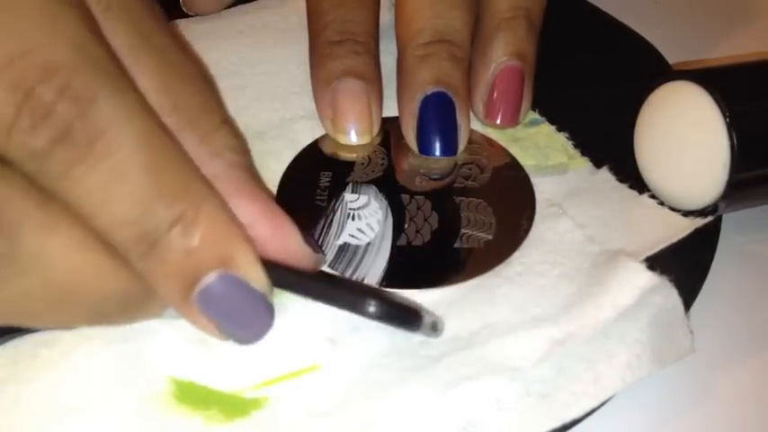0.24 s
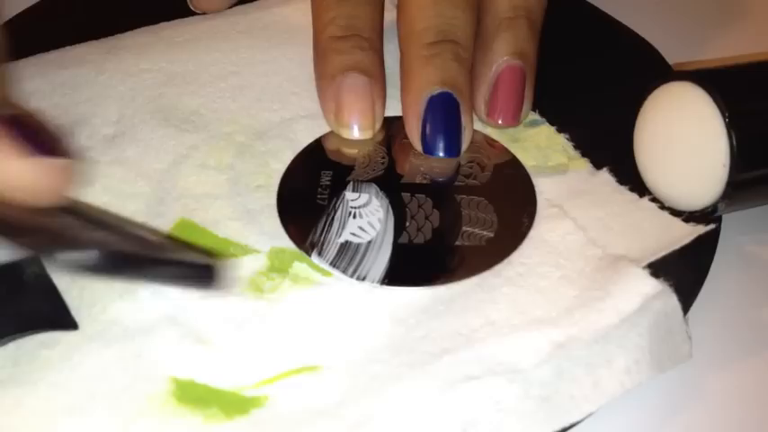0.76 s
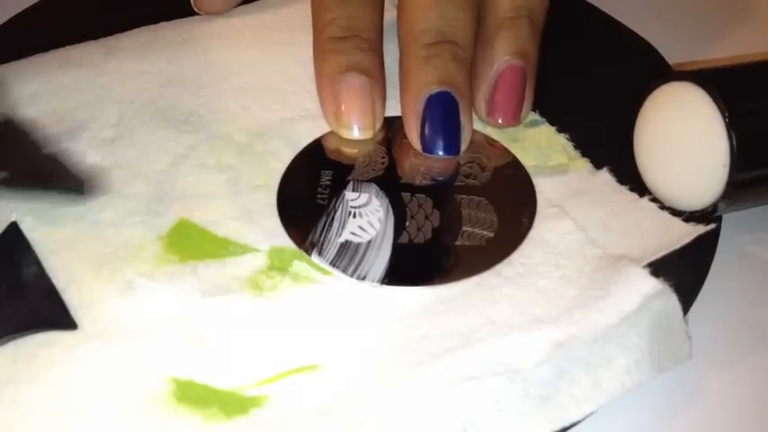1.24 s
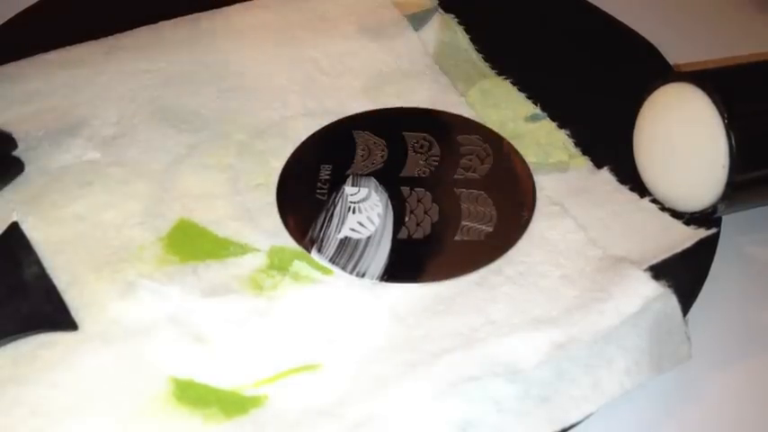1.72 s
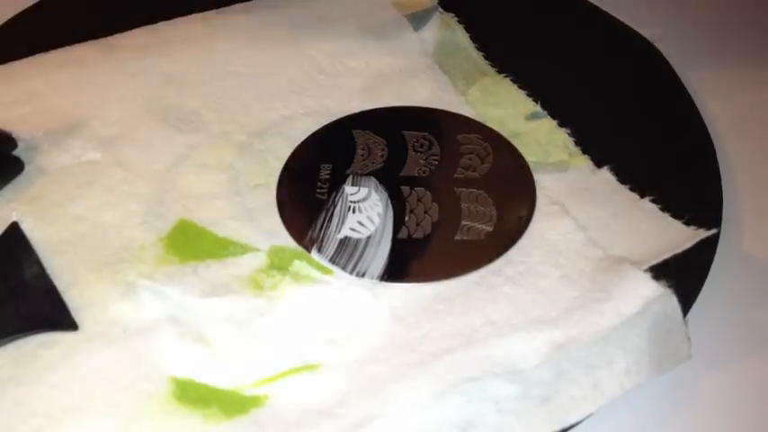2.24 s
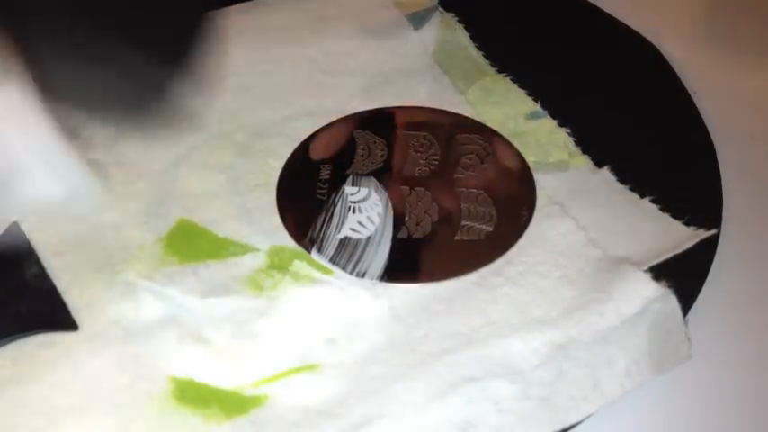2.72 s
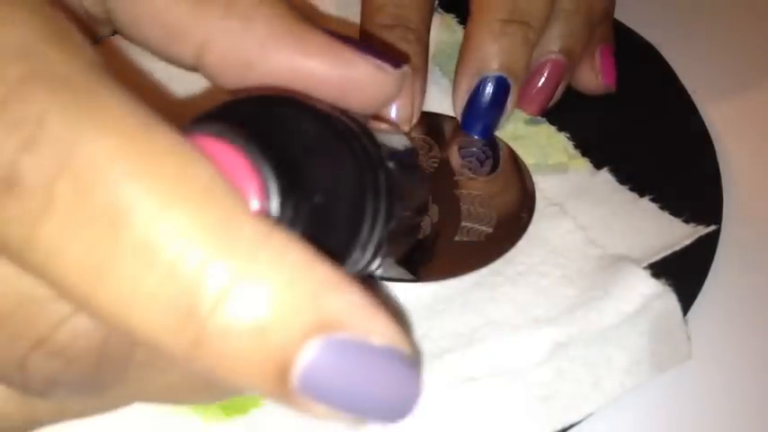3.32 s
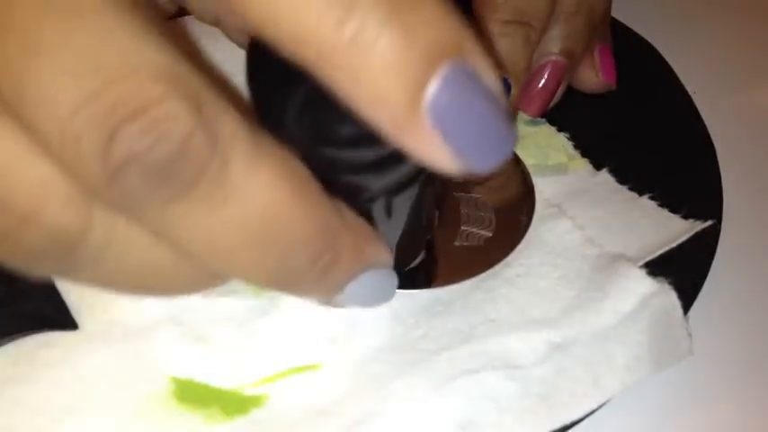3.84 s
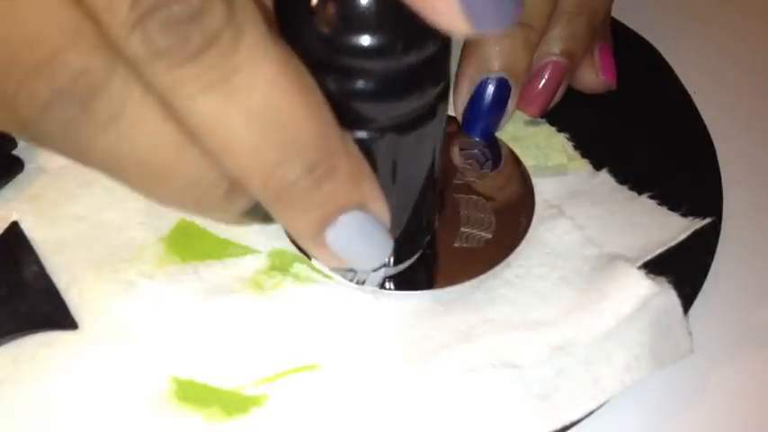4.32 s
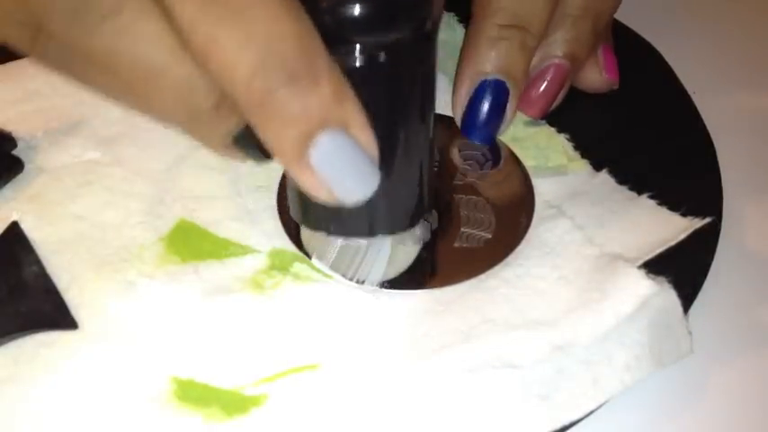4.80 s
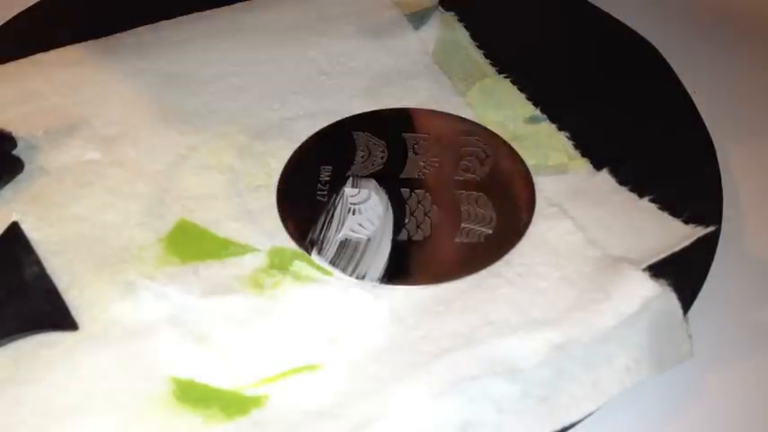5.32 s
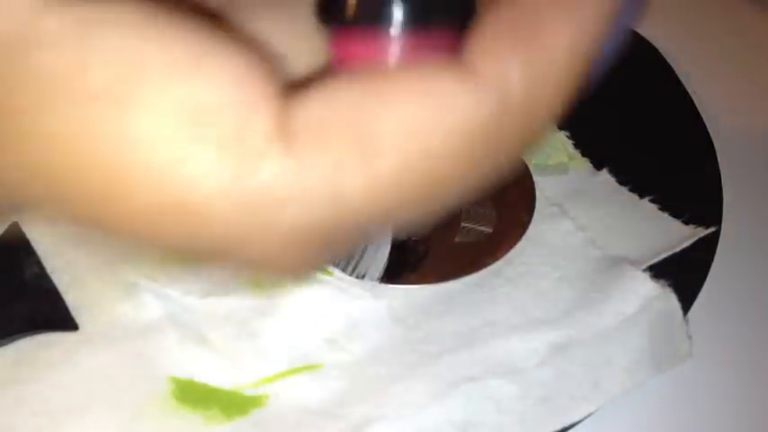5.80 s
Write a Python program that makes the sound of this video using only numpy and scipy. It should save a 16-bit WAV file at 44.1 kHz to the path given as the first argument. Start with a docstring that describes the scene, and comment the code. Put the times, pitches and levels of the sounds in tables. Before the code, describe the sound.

A short fading scrape on a steel plate breaks into a loud metallic snap, followed at once by coarse wiping on a paper towel. Light papery rustles, ticks and a firm thud lead to a fast hollow judder on the table. Then mostly quiet hiss with small plastic clicks, a low bump, and a brief tacky tearing sound. Dry, close microphone, small room, same in both channels.

```python
"""Scraping and stamping with nail polish

A plastic scraper is dragged over an etched steel stamping plate, snaps off its rim and is wiped on a paper towel.
Hands brush the towel and bump the table; a hollow stamper is picked up, rolled over the tacky plate and lifted off.
Rubbing is dense random slips through resonances or spectra; knocks are short pushes into decaying modes.
One close microphone with some hiss, in a small, quiet room; both channels carry the same sound."""
import sys
import numpy as np
from scipy import signal
from scipy.fft import rfft, irfft
from scipy.io import wavfile
from scipy.ndimage import uniform_filter1d, map_coordinates

SR = 44100
rng = np.random.default_rng(int(sys.argv[2]) if len(sys.argv) > 2 else 0)


def wrap_up_sound(samples):
    """Save the sound to the file named by the first command line argument, as 16-bit audio."""
    columns = np.atleast_2d(samples).T
    # keep every value between -1 and 1, then stretch to whole-number steps
    tamed = np.clip(columns, -1, 1)
    steps = np.round(tamed * 32767).astype(np.int16)
    wavfile.write(sys.argv[1], SR, steps)


N = 267334  # samples


# close to the microphone, the edge catches in the etching: t/s, level/dB
ETCHING_CATCHES = [(.008, -20), (.027, -34), (.0365, -29), (.063, -26), (0.067, -24.5), (.107, -26),
                   (.129, -26), (.186, -30.5)]
# resonances of blade and plate: f/Hz, width/Hz, level/dB
BLADE_RESONANCES = [(267, 153, -0.5), (1280, 220, -1.5), (2120, 410, 0), (2640, 340, 3.5), (4020, 590, 0.5),
                    (5730, 1100, -1.5), (7400, 820, -4.5), (8400, 300, -3), (9070, 1200, -9)]
# the pressure eases steadily until the edge reaches the rim
SCRAPE_DB, SCRAPE_SAG_DB_PER_S, SCRAPE_END_S, SCRAPE_FALL_S = -30, 39, 0.2, .035
CATCH_S = 0.0048  # a catch loses 17 dB in this time


def scraper():
    """The edge slips over the etched steel and catches in its grooves; both ring blade and plate."""
    t = np.arange(N) / SR
    pressure = undb(SCRAPE_DB - SCRAPE_SAG_DB_PER_S * t)
    force = pressure * stroke(0, SCRAPE_FALL_S, SCRAPE_END_S, SCRAPE_FALL_S)
    for s, db in ETCHING_CATCHES:
        add(force, s, undb(db) * np.exp(-2 * t[:SR // 10] / CATCH_S))
    slips = unit(grit(rate=6000, spread_db=2.5, chatter_hz=302, chatter_db=1.0))
    steady_level = np.std(body(slips, BLADE_RESONANCES))
    return body(slips * force, BLADE_RESONANCES) / steady_level


# the blade snaps off the rim and slaps the plate: t/s, peak level/dB, contact/s
RIM_SNAPS = [(.2139, -4.5, 0.00028), (.2152, -11, 0.00096), (.244, -19.5, 0.00053)]
# modes of the plate lying on the towel: f/Hz, level/dB, t60/s
PLATE_MODES = [(257, -5.5, 0.079), (335, -17, .08), (395, -2, 0.095), (445, -1.5, 0.1), (497, 0, 0.026),
               (762, -4.5, 0.059), (1210, -7, 0.025), (1414, -10.5, 0.033), (1990, 4.5, 0.013),
               (2620, -1.5, 0.02), (3540, -4, 0.029), (3780, -8, 0.05), (6260, 12.5, 0.0098)]


def snap():
    """The released blade strikes the plate and excites its modes."""
    return knocks(RIM_SNAPS, PLATE_MODES, rattle_db=-1, rattle_t60=0.21, rattle_hz=515)


# the blade wiped hard on the towel: t/s at full speed, rise/s, hold/s, fall/s, level/dB
HARD_WIPES = [(0.245, 0.019, 0.018, 0.078, -32), (0.454, .003, .002, 0.023, -32),
              (0.483, 0.048, 0.063, 0.0099, -23)]
# light brushes over the towel:
# t/s at full speed, rise/s, hold/s, fall/s, fibre hiss level/dB, dull rub level/dB
LIGHT_BRUSHES = [(0.647, .12, .015, .07, -45, -52.5), (0.944, 0.065, .12, 0.22, -36, -42.5),
                 (1.295, 0.089, .045, 0.062, -31, -36), (1.471, 0.093, .03, .1, -41.5, -54),
                 (1.546, .04, 0.053, .12, -34, -41.5), (1.659, .04, .008, 0.15, -37.5, -46),
                 (2.071, 0.024, 0.0073, 0.018, -33.5, -40), (2.77, 0.082, .04, 0.1, -46.5, -46.5),
                 (5.08, 0.077, .035, 0.12, -40, -45), (5.213, .04, .008, 0.067, -46, -47.5),
                 (5.317, .05, .015, 0.27, -47.5, -51.5), (5.555, 0.12, 0.21, 0.18, -51, -56),
                 (5.897, .16, 0.077, .025, -44, -52.5)]
# spectra of the hard wipe, the fibre hiss and the dull rub: f/Hz, level/dB per Hz
WIPE_SPECTRUM = [(70, -49), (140, 13), (220, 13), (450, 7.5), (700, -3.5), (1250, 1), (1800, -2), (2700, 1),
                 (4000, 1.5), (7200, -0.5), (9600, -3), (10800, -16), (15000, -12.5)]
FIBRE_SPECTRUM = [(1500, -26), (3000, -6), (3900, -1), (6000, -4), (7000, 0.5), (8200, -1.5), (9600, -8),
                  (11000, -11.5), (15000, -19)]
RUB_SPECTRUM = [(80, -41), (170, 5.5), (450, 3.5), (700, -9), (1050, 2), (1700, -4), (2600, -0.5),
                (3600, -8), (6000, -35)]


def towel():
    """Paper fibres flick under the blade; hard wipes also shake the table, light brushes mostly hiss."""
    wipe = unit(colour(grit(rate=12000, spread_db=1.7, chatter_hz=309, chatter_db=1.6), WIPE_SPECTRUM))
    fibres = unit(colour(grit(rate=10000, spread_db=1.8, chatter_hz=148.0, chatter_db=0.5), FIBRE_SPECTRUM))
    rub = unit(colour(grit(rate=6500, spread_db=2.5, chatter_hz=79.46, chatter_db=4.0), RUB_SPECTRUM))
    out = np.zeros(N)
    for s, rise, hold, fall, db in HARD_WIPES:
        out += stroke(s, rise, hold, fall) * undb(db) * wipe
    for s, rise, hold, fall, hiss_db, rub_db in LIGHT_BRUSHES:
        out += stroke(s, rise, hold, fall) * (undb(hiss_db) * fibres + undb(rub_db) * rub)
    return out


# blows that reach the table: t/s, peak level/dB, contact/s
TABLE_BLOWS = [(.114, -24.5, 0.0013), (.216, -14, 0.0033), (.956, -30.5, 0.00095), (1.523, -29.5, 0.008),
               (1.622, -30, 0.0027), (1.6725, -7.5, 0.0049), (2.035, -25.5, 0.0015), (2.081, -21.5, 0.0027),
               (2.535, -30.5, 0.0016), (2.761, -29.5, 0.00057), (2.801, -31.5, .0006),
               (4.6882, -19.5, 0.00025), (4.6905, -15, 0.0065), (4.787, -33, .005), (4.847, -21, 0.0068),
               (4.854, -27, 0.0021), (5.0992, -23.5, 0.00091)]
# modes of the table under the plate: f/Hz, level/dB, t60/s
TABLE_MODES = [(160.7, -9.5, 0.19), (195, -8.5, 0.095), (221, -6.5, 0.053), (245, -5, 0.1), (325, 0, 0.056),
               (375, -0.5, 0.04), (459, -3, 0.11), (504, 1.5, 0.048), (620, -13, 0.037),
               (1120, -1.5, 0.049), (2500, 9.5, 0.012)]


def table_bumps():
    """Blows push into the modes of the table."""
    return knocks(TABLE_BLOWS, TABLE_MODES, rattle_db=7.5, rattle_t60=0.068, rattle_hz=416)


# the stamper judders on the table as it is picked up: t/s, peak level/dB, contact/s
STAMPER_JUDDER = [(2.035, -31, 0.0021), (2.0445, -43, .0012), (2.0495, -20, 0.0017), (2.0605, -14, 0.0016),
                  (2.0692, -11, 0.00092), (2.0715, -15, 0.00029), (2.0765, -18, 0.00024),
                  (2.0832, -8, 0.001)]
# modes of the hollow stamper: f/Hz, level/dB, t60/s
STAMPER_MODES = [(445.5, -11, 0.15), (531, -6, 0.11), (509, -0.5, 0.089), (672, -5.5, 0.057),
                 (867, 2.5, 0.068), (940, -14, .05), (961, 6, 0.083), (1140, -22, 0.054), (1256, -9, 0.091),
                 (1646, -3, 0.036), (2290, -5.5, 0.033), (2650, -25, .03)]


def stamper_judder():
    """Quick repeated contacts with the table ring the hollow stamper."""
    return knocks(STAMPER_JUDDER, STAMPER_MODES, rattle_db=-3, rattle_t60=0.12, rattle_hz=1200)


# the blade or the rubber pad grips and shudders at one resonance:
# t/s at the middle, level/dB, length/s, f/Hz, width/Hz of each of two filter passes
GRIP_SHUDDERS = [(.481, -30.5, 0.0072, 3950, 600), (.4945, -24.5, 0.0067, 1244, 400),
                 (.536, -27.5, 0.014, 4000, 600), (.545, -28.5, 0.012, 9040, 1300),
                 (.959, -36, 0.02, 1130, 700), (1.322, -40, 0.032, 440, 260), (4.98, -45, 0.04, 178, 50),
                 (5.032, -37, 0.033, 185, 40), (5.109, -35, 0.017, 205, 90)]


def grips():
    """Brief bursts of stick and slip, each swelling and dying in one narrow band."""
    out, t = np.zeros(N), np.arange(-SR // 8, SR // 8) / SR
    for s, db, length, hz, width_hz in GRIP_SHUDDERS:
        once = resonate(rng.standard_normal(len(t)), hz, width_hz)
        shudder = unit(resonate(once, hz, width_hz))
        add(out, s + t[0], undb(db) * shudder * np.exp(-2 * (t / length) ** 2))
    return out


# resonances of the peeling pad: f/Hz, width/Hz, level/dB
PAD_RESONANCES = [(203, 47, 17.5), (530, 100, 5), (1044, 95, 13.5), (1240, 110, 7), (2220, 88, 10.5),
                  (2690, 130, 6.5)]
# the pad peels off the tacky polish, harder and harder until it lets go
PEEL_S, PEEL_LENGTH_S, PEEL_DB, PEEL_GROWTH_DB_PER_S, PEEL_EDGE_S = 5.0985, 0.0189, -34.5, 270, 0.0024


def peel():
    """Threads of polish tear in quick succession and ring the stamper's pad."""
    tears = grit(rate=2400, spread_db=3.0, chatter_hz=300, chatter_db=0.5)
    pulled_s = np.clip(np.arange(N) / SR - PEEL_S, 0, PEEL_LENGTH_S)
    pull = undb(PEEL_DB + PEEL_GROWTH_DB_PER_S * pulled_s)
    pull = pull * stroke(PEEL_S, PEEL_EDGE_S, PEEL_LENGTH_S, PEEL_EDGE_S)
    return unit(body(tears, PAD_RESONANCES)) * pull


# sharp ticks of plastic, nails and tacky polish: t/s, peak level/dB, t60/s, tilt/dB per octave
CONTACT_TICKS = [(0.2136, -1, 0.0097, 0.5), (0.2164, -13, 0.014, -8.5), (0.3232, -28, 0.0094, 1),
                 (0.709, -17, 0.013, 7.5), (1.589, -12.5, 0.0076, -2), (1.596, -17, .012, 6),
                 (1.625, -16.5, 0.0054, 2), (1.7058, -21, .008, 3), (1.7448, -20, 0.01, 3),
                 (1.756, -22, 0.015, 3.5), (2.503, -20, 0.013, -1.5), (2.537, -30.5, 0.024, 4),
                 (2.86, -28, 0.021, 1.5), (2.963, -28.5, 0.012, -3.5), (4.6883, -22, 0.011, -7),
                 (4.9553, -22, 0.011, -2), (5.064, -23, 0.016, -2.5), (5.0782, -19.5, 0.017, -0.5),
                 (5.0988, -17.5, .008, -1), (5.2163, -25.5, 0.015, 0), (5.247, -23.5, 0.024, -0.5)]


def ticks():
    """Sharp contacts crack briefly, each with its own brightness."""
    out = np.zeros(N)
    for s, db, t60, tilt_db in CONTACT_TICKS:
        add(out, s, undb(db) * crack(t60, tilt_db))
    return out


# the stamper's casing creaks in the fingers, one dry click at a time: t/s, peak level/dB
CASING_CREAKS = [(3.1173, -23.5), (3.1425, -24), (3.146, -26), (3.2653, -24.5), (3.2845, -26.5),
                 (3.3258, -26), (3.366, -25), (3.4054, -22), (3.4442, -26), (3.4606, -25.5)]
CREAK_T60_S, CREAK_TILT_DB = .0048, .5  # tilt per octave


def creaks():
    """The casing slips in small steps, so its clicks are alike."""
    out = np.zeros(N)
    for s, db in CASING_CREAKS:
        add(out, s, undb(db) * crack(CREAK_T60_S, CREAK_TILT_DB))
    return out


# spectrum of one tick before its tilt: f/Hz, level/dB per Hz
TICK_SPECTRUM = [(200, -5.5), (1500, -11.5), (2800, -1.5), (4000, 4), (6300, 3.5), (8500, 2), (10500, -7.5),
                 (15000, -17.5)]


def crack(t60, tilt_db):
    """One tiny noise burst of peak 1 that dies within milliseconds."""
    t = np.arange(SR // 20) / SR
    burst = rng.standard_normal(len(t)) * fade(t, t60) * (1 - np.exp(-t / 0.00027))
    sound = colour(burst, TICK_SPECTRUM, tilt_db)
    return sound / np.abs(sound).max()


# fingers slide on smooth plastic:
# t/s at full speed, rise/s, hold/s, fall/s, level/dB, f/Hz at the centre of the swish
FINGER_SLIDES = [(2.059, .035, .02, 0.014, -38.5, 8600), (2.71, .08, .012, .11, -46, 9900)]
SLIDE_BAND_OCTAVES = 0.4


def slides():
    """Skin on smooth plastic gives only a thin, high swish in one band."""
    out, noise = np.zeros(N), rng.standard_normal(N)
    for s, rise, hold, fall, db, hz in FINGER_SLIDES:
        edges = hz * 2 ** (SLIDE_BAND_OCTAVES * np.array([-.5, .5]))
        swish = signal.sosfilt(signal.butter(2, edges, btype="band", fs=SR, output="sos"), noise)
        out += undb(db) * unit(swish) * stroke(s, rise, hold, fall)
    return out


def hand_echo(x, lag_s, echo_db):
    """The moving hand reflects the sound a moment later, so a comb of peaks drifts through it."""
    lag = lag_s * SR * np.exp(0.189 * uniform_filter1d(walk(rate=5), size=4000))
    echo = map_coordinates(x, [np.arange(N) - lag], order=3)
    return (x + undb(echo_db) * echo) / np.hypot(1, undb(echo_db))


ROOM_T60_S, ROOM_DB = 0.18, -13  # level before the tail is coloured


def room(x):
    """A short, dull tail from the nearby walls: decaying noise that starts after 5 ms."""
    t = np.arange(SR // 2) / SR
    tail = rng.standard_normal(len(t)) * fade(t, ROOM_T60_S) * (t > .005)
    tail = colour(tail / np.linalg.norm(tail), [(200, 2), (1000, -1), (4000, 2), (12000, 0)])
    return undb(ROOM_DB) * signal.fftconvolve(x, tail)[:N]


# room noise and microphone hiss: f/Hz, level/dB per Hz
AIR_SPECTRUM = [(30, -19.5), (60, -20), (100, -12), (130, -4), (200, 1), (310, -4), (550, -7), (1100, -9.5),
                (2700, -12), (4100, -10.5), (5200, -13.5), (7600, -13.5), (10200, -19.5), (13800, -13.5)]
AIR_DB = -44.5


def background():
    """Steady low room noise and microphone hiss, as filtered random noise."""
    return undb(AIR_DB) * unit(colour(rng.standard_normal(N), AIR_SPECTRUM))


def knocks(events, modes, rattle_db, rattle_t60, rattle_hz):
    """Each blow is a short push into the modes; a longer contact leaves only the low ones."""
    out, t = np.zeros(N), np.arange(SR // 3) / SR
    ring = sum(undb(db) * np.sin(2 * np.pi * hz * t) * fade(t, t60) for hz, db, t60 in modes)
    ring = ring * (1 - np.exp(-t / 0.00039))  # the vibration takes a moment to spread
    for s, db, contact in events:
        push = t * np.exp(-2 * np.pi * t / contact)
        # many weak, crowded modes blur the ring
        crowd = resonate(rng.standard_normal(len(t)), rattle_hz, 1040)
        rattle = undb(rattle_db) * crowd * fade(t, rattle_t60)
        sound = signal.fftconvolve(ring + rattle, push)[:len(t)]
        add(out, s, undb(db) * sound / np.abs(sound).max())
    return out


def grit(rate, spread_db, chatter_hz, chatter_db):
    """Dense tiny slips of uneven size, bunched as the contact grips and lets go."""
    slips = (rng.random(N) < rate / SR) * rng.choice([-1, 1], N)
    return slips * undb(spread_db * rng.exponential(size=N) + chatter_db * walk(chatter_hz))


STROKE_RANGE_DB = 20  # change of level over one rise or fall time


def stroke(s, rise, hold, fall):
    """Gain of one stroke: swells up to time s, holds, dies away."""
    t = np.arange(N) / SR
    away = np.maximum(s - t, 0) / rise + np.maximum(t - s - hold, 0) / fall
    return undb(-STROKE_RANGE_DB * np.minimum(away, 10))


def body(x, resonances):
    """A bank of (Hz, width, dB) resonances; neighbours swing in opposite directions."""
    out = np.zeros(len(x))
    for k, (hz, width_hz, db) in enumerate(resonances):
        out += (-1) ** k * undb(db) * resonate(x, hz, width_hz)
    return out


def resonate(x, hz, width_hz):
    """Two-pole resonance, gain 1 at its centre."""
    return signal.lfilter(*signal.iirpeak(hz, hz / width_hz, fs=SR), x)


def colour(x, points, tilt_db=0):
    """Causal filter through (Hz, dB) points, tilted by some dB an octave."""
    size = 4096
    hz, db = np.transpose(points)
    octave = np.log2(np.maximum(np.fft.rfftfreq(size, 1 / SR), 1))
    gain = undb(np.interp(octave, np.log2(hz), db + tilt_db * np.log2(hz / hz[0])))
    # folding the cepstrum forward in time gives minimum phase
    cepstrum = irfft(np.log(gain))
    cepstrum[1:size // 2] *= 2
    cepstrum[size // 2 + 1:] = 0
    response = irfft(np.exp(rfft(cepstrum)))
    return signal.fftconvolve(x, response)[:len(x)]


def walk(rate):
    """Random values with spread near 1, rate of them a second, joined by straight lines."""
    return np.interp(np.arange(N) / SR * rate, np.arange(N), rng.standard_normal(N))


def fade(t, t60):
    """Decay that loses 60 dB in t60 seconds."""
    return np.exp(-np.log(1000) * t / t60)


def undb(db):
    """Decibels to gain."""
    return 10 ** (np.asarray(db) / 20)


def unit(x):
    """Scale to rms 1."""
    return x / np.sqrt(np.mean(x ** 2))


def add(track, s, sound):
    """Mix a sound in at time s."""
    start = max(int(s * SR), 0)
    track[start:start + len(sound)] += sound[:N - start]


# the microphone's port lifts a band near 4 kHz and cancels one just above it: f/Hz, level/dB
PORT_RESPONSE = [(3000, 0.5), (4350, 1), (4750, -5.5), (5080, -17), (5500, -8), (6200, -0.5), (7000, -5),
                 (8200, -0.5), (10000, -0.5), (11000, -1)]
LOW_CUT_HZ = 137


def scene():
    """All handling sounds at one spot, heard through the close microphone's port."""
    rubbing = scraper() + towel() + slides()
    near = hand_echo(rubbing, lag_s=0.001395, echo_db=-9.5)
    near += ticks() + creaks() + peel() + grips()
    near += snap() + table_bumps() + stamper_judder()
    near = colour(near + room(near), PORT_RESPONSE)
    # the small microphone is deaf to deep bass
    near = signal.sosfilt(signal.butter(N=6, Wn=LOW_CUT_HZ, btype="high", fs=SR, output="sos"), near)
    return np.tile(near + background(), (2, 1))


TOP_HZ = 15300


def record(dry):
    """The recorder clips at full scale and cuts the top."""
    clipped = np.clip(dry, -1, 1)
    return signal.sosfilt(signal.ellip(12, .1, 70, TOP_HZ, fs=SR, output="sos"), clipped)


dry = scene()
out = record(dry)
wrap_up_sound(out)
```